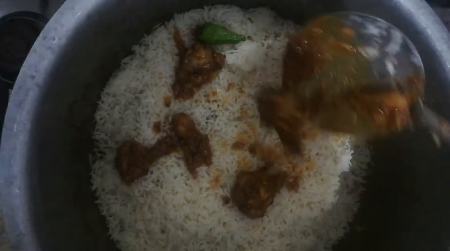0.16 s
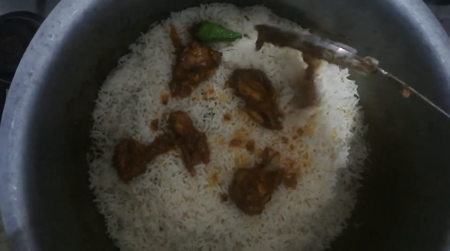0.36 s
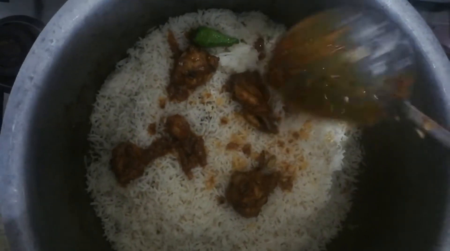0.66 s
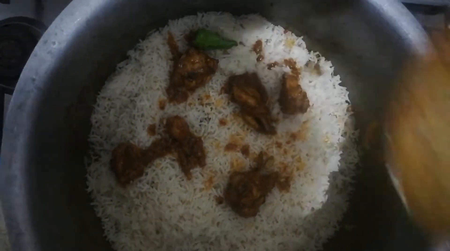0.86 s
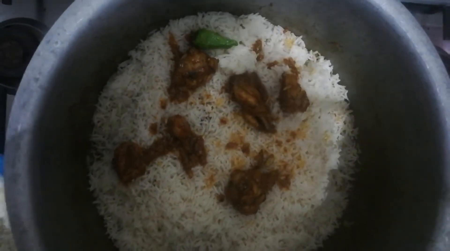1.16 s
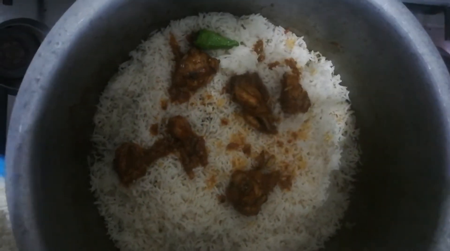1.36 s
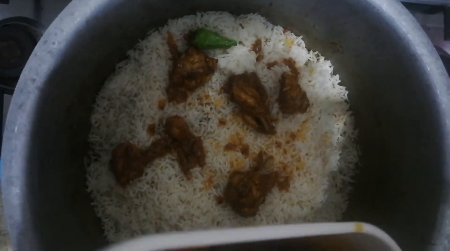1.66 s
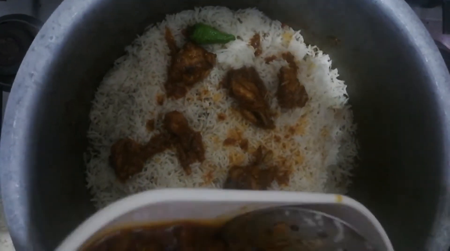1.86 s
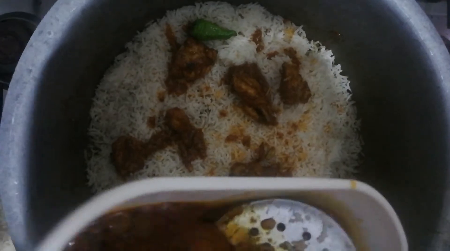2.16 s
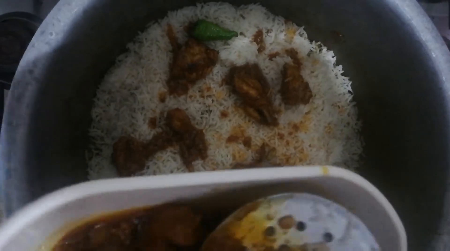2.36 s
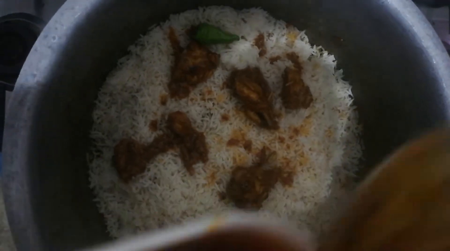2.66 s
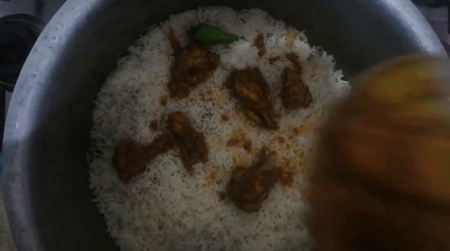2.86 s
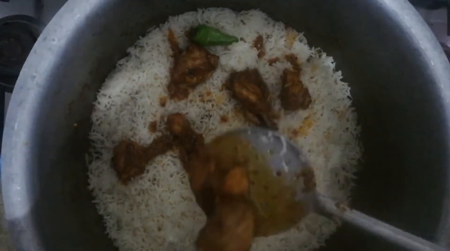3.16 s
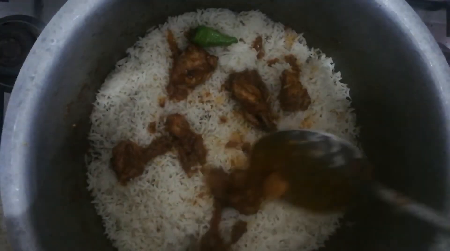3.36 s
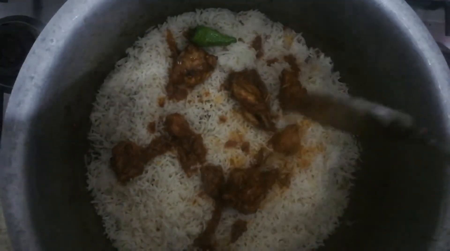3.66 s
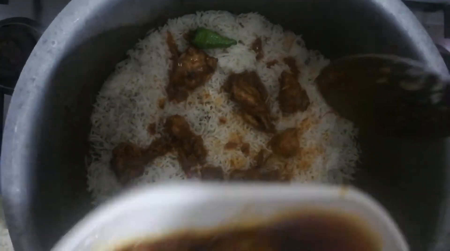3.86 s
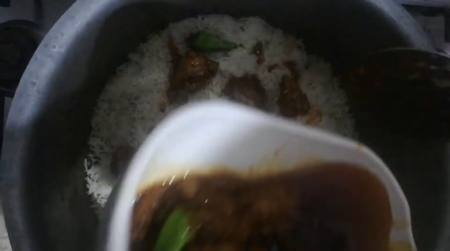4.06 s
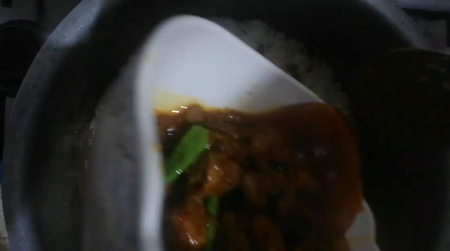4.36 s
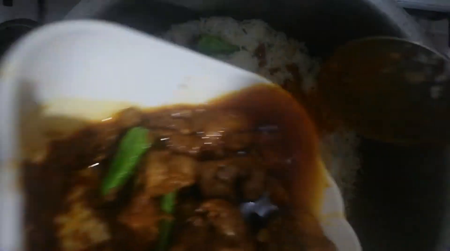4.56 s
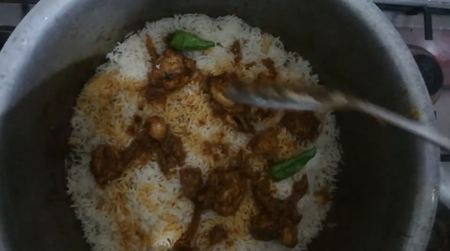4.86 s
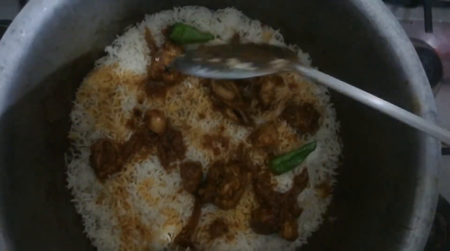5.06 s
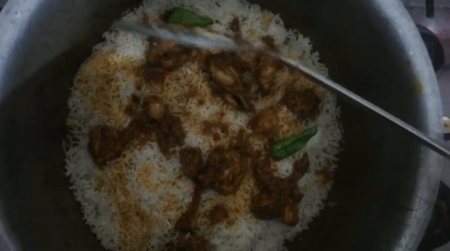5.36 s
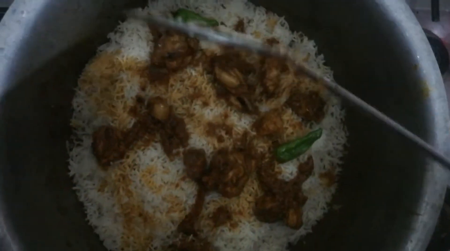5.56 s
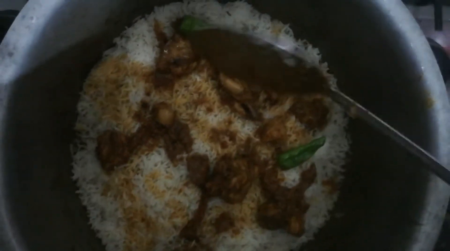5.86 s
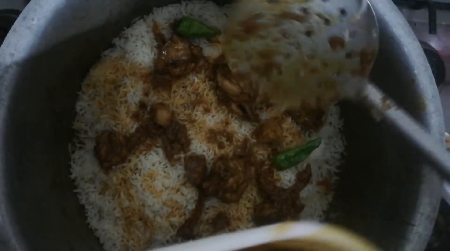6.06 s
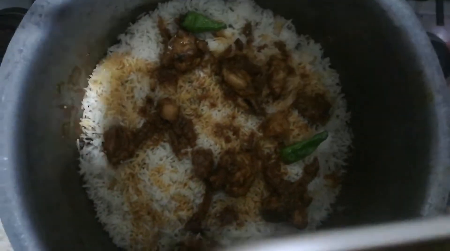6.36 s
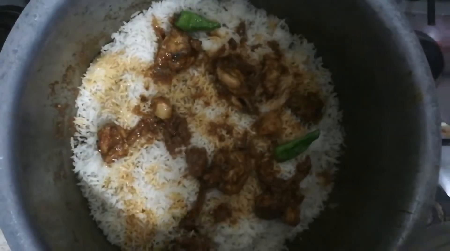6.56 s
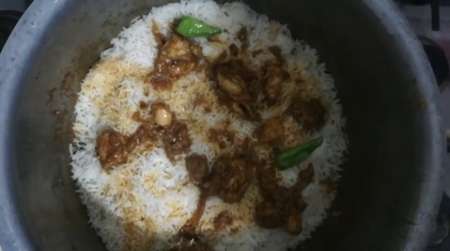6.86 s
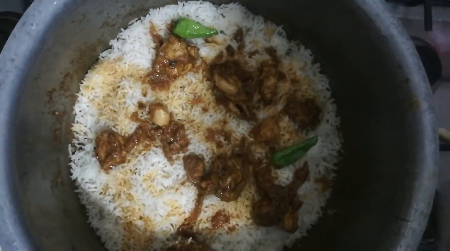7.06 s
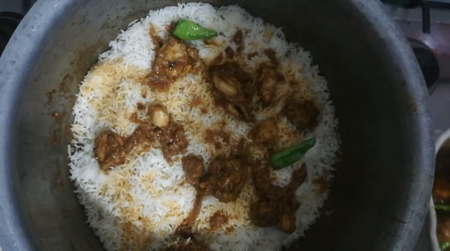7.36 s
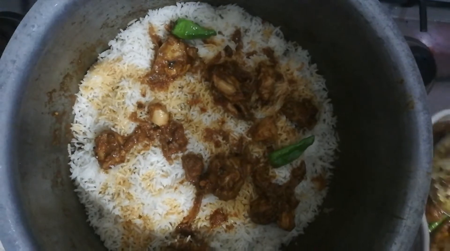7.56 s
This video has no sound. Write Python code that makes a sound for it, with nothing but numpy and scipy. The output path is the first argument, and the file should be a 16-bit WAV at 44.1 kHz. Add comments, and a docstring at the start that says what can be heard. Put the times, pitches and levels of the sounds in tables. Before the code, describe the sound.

Food simmers faintly over a low hum in a small, hard-walled kitchen, with a brief sizzle and soft bumps on the microphone. A steel spoon knocks several times in a plastic bowl close by, and a big metal pot takes one dull, ringing bump. The spoon squelches out of the curry, then gravy slides off it with tiny wet pops. The simmer settles and a soft, low rumble sets in.

```python
"""Curry is spooned from a plastic bowl onto rice in a big metal pot, in a small hard-walled kitchen.
Over a low hum the food simmers, the first spoonful sizzles and a hand softly bumps the microphone.
From 1.5 s the steel spoon knocks and scrapes in the bowl; the pot takes one ringing bump at 2.2 s.
The spoon squelches free at 2.7 s. Gravy slides off it around 4.8 s, as the simmer settles,
and a low rumble, likely the gas flame, sets in under the pot."""
import sys
import numpy as np
from scipy import signal
from scipy.fft import rfft, irfft, next_fast_len
from scipy.io import wavfile
from scipy.ndimage import uniform_filter1d

SR = 44100
rng = np.random.default_rng(int(sys.argv[2]) if len(sys.argv) > 2 else 0)


def inscribe(sig):
    """Save sig as 16-bit PCM at rate SR to the path in sys.argv[1].

    A 1-D sig is mono; a 2-D sig holds one channel per row.
    Samples are clipped to [-1, 1] before scaling.
    """
    pcm = np.round(np.clip(np.atleast_2d(sig).T, -1, 1) * 32767)
    wavfile.write(sys.argv[1], SR, pcm.astype(np.int16))


N = 340493
TIME = np.arange(N) / SR
RING = np.arange(2 ** 16) / SR  # time axis of one hit and its tail, s


def amp(db):
    """Decibels to gain."""
    return 10 ** (np.asarray(db) / 20)


def unit(x):
    """Scale to rms 1."""
    return x / np.sqrt(np.mean(x ** 2))


def add(out, s, x):
    """Mix x into out from time s on."""
    i = int(s * SR)
    out[i:i + len(x)] += x[:N - i]


def fade(t60):
    """Exponential decay, 60 dB down after t60 seconds."""
    return np.exp(-np.log(1000) * RING / t60)


def ramp(from_s, to_s):
    """0 before from_s, 1 after to_s, straight between."""
    return np.clip((TIME - from_s) / (to_s - from_s), 0, 1)


def waver(per_s):
    """Random modulation with rms 1, gliding to a new value per_s times a second."""
    return unit(np.interp(TIME * per_s, np.arange(1000), rng.standard_normal(1000)))


def at_hz(hz, points):
    """Read (f/Hz, value) points on a log-frequency axis."""
    f, value = np.transpose(points)
    return np.interp(np.log(hz + 1), np.log(f), value)


def colour(x, points):
    """EQ x along (f/Hz, level/dB) points, with steep skirts past both ends; rms 1."""
    size = next_fast_len(len(x), real=True)
    hz = np.fft.rfftfreq(size, 1 / SR) + 1
    skirts = 1 / np.sqrt(1 + (.8 * points[0][0] / hz) ** 8 + (.8 * hz / points[-1][0]) ** 8)
    spectrum = rfft(x, size) * amp(at_hz(hz, points)) * skirts
    return unit(irfft(spectrum, size)[:len(x)])


def noise(points, like=TIME):
    """Coloured noise with rms 1."""
    return colour(rng.standard_normal(len(like)), points)


def bursts(per_s, spread_db):
    """Crackle: many tiny clicks of uneven size."""
    fires = rng.random(N) < per_s / SR
    size = np.minimum(rng.exponential(size=N), 5)
    return fires * amp(spread_db * size) * rng.choice([-1, 1], N)


def band(x, hz, width_hz):
    """Two identical resonators in series, each width_hz wide."""
    b, a = signal.iirpeak(hz, hz / min(width_hz, SR / 4), fs=SR)
    return signal.lfilter(b, a, signal.lfilter(b, a, x))


def soften(x, hz):
    """Low-pass: a softer contact loses the treble above hz."""
    return signal.sosfilt(signal.butter(2, hz, fs=SR, output="sos"), x)


def thin(x, hz):
    """High-pass: a vessel radiates hardly any bass below hz."""
    return signal.sosfilt(signal.butter(3, hz, "high", fs=SR, output="sos"), x)


def drone(tones):
    """Narrow resonances kept going by noise."""
    return sum(amp(db) * unit(band(rng.standard_normal(N), hz, 2 * width)) for hz, width, db in tones)


def ring(modes, contact_s=0.00034):
    """Struck modes (f/Hz, level/dB, t60/s) that build up while the contact lasts."""
    out = np.zeros(len(RING))
    for k, (hz, db, t60) in enumerate(modes):
        t = RING[:int(2 * t60 * SR)]
        out[:len(t)] += (-1) ** k * amp(db - 60 * t / t60) * np.sin(2 * np.pi * hz * t)
    return out * (1 - np.exp(-RING / contact_s))


def die_away(x, t60s):
    """Let each octave of x decay at its own rate, read from (f/Hz, t60/s) points."""
    spectrum = rfft(x)
    octave = np.log2(np.maximum(np.fft.rfftfreq(len(x), 1 / SR), 64))
    out = np.zeros(len(x))
    for k in range(6, 16):
        share = np.maximum(1 - abs(octave - k), 0)
        out += irfft(spectrum * share, len(x)) * fade(at_hz(2 ** k, t60s))
    return out


def reverb(x, tail):
    """Convolve x with a tail scaled to an energy of 1."""
    return signal.fftconvolve(x, tail / np.sqrt(np.sum(tail ** 2)))[:N]


def hum(start_db=-65.5, fall_db_per_s=0.5, waver_db=0.8):
    """Appliance hum: a wavering, slowly fading low bed under four steady resonances."""
    # spectrum of the bed: f/Hz, level/dB
    bed_colour = [(12, -44), (20, -9), (43, -5.5), (81, -4), (105, -6), (135, -3.5), (179, -6), (225, -4),
                  (263, -8.5), (600, -18.5), (780, -49), (1320, -120)]
    # appliance resonances: f/Hz, width/Hz, level/dB
    tones = [(80.4, 4.7, -74.5), (150, 14, -76.5), (213.2, 5.9, -73), (235.2, 4.9, -76.5)]
    level_db = start_db - fall_db_per_s * TIME + waver_db * waver(per_s=3.87)
    return amp(level_db) * noise(bed_colour) + drone(tones)


def simmer(early_db=-64, late_db=-73.5, flicker_db=1.5):
    """Hot food simmers in dense, tiny pops, then settles to a fainter fizz."""
    # spectrum of the fizz: f/Hz, level/dB
    fizz_colour = [(600, -19), (1100, -11), (1500, -3.5), (2500, 1), (4700, 1.5), (6000, -5.5), (8000, -12),
                   (11000, -9), (15500, -20)]
    level_db = early_db + (late_db - early_db) * ramp(3.65, 5.5) + flicker_db * waver(per_s=60)
    return amp(level_db) * colour(bursts(per_s=6000, spread_db=3.5), fizz_colour)


def room_tone(level_db=-65):
    """The even hiss of the kitchen."""
    # spectrum of the hiss: f/Hz, level/dB
    hiss_colour = [(320, -15), (550, -8), (660, -7), (815, -2), (978, -2.5), (1190, -0.5), (1280, -3),
                   (1620, -1), (2120, -1.5), (2620, -8), (3180, -8.5), (4280, -10), (8880, -9.5),
                   (11400, -12), (15800, -28)]
    return amp(level_db) * noise(hiss_colour)


def spatter(per_s=9, level_db=-56, spread_db=2, centre_hz=1790, spread_octaves=0.3):
    """The cooking food spits faintly: one snap at a random moment in each time slot."""
    out, count = np.zeros(N), int(per_s * N / SR)
    for slot, (when, size, pitch) in enumerate(rng.uniform(-1, 1, (count, 3))):
        spit = snap(centre_hz * 2 ** (spread_octaves * pitch))
        add(out, (slot + .5 + .5 * when) / per_s, amp(level_db + spread_db * size) * spit)
    return out


def snap(hz, t60=0.028, attack_s=0.00023):
    """A short noise burst around hz with a peak of 1: a film of sauce breaks, or a bit of food lands."""
    envelope = (fade(t60) * (1 - np.exp(-RING / attack_s)))[:SR // 20]
    burst = band(rng.standard_normal(len(envelope)) * envelope, hz, width_hz=0.77 * hz)
    return burst / abs(burst).max()


def sizzle(peak_s=0.6, spread_s=0.83, level_db=-70):
    """The first spoonful sizzles on the hot rice: a fine, high fizz that swells and fades."""
    fizz = band(bursts(per_s=2200, spread_db=3), hz=10700, width_hz=4800)
    swell = np.exp(-((TIME - peak_s) / spread_s) ** 2)
    return amp(level_db) * swell * unit(fizz)


def gravy(rise_octaves_per_s=36.2):
    """Films of sauce snap and bits of food land; the air pockets behind the films chirp raggedly upward as they
    open."""
    # larger air pockets: t/s, starting f/Hz, level/dB, length/s
    bubbles = [(2.667, 3620, -50, .008), (2.68, 3010, -31, 0.0028), (2.698, 4480, -31.5, 0.0041),
               (2.722, 6100, -51, .005), (2.774, 4820, -40, 0.0045), (2.786, 8500, -51, 0.0041),
               (4.59, 2800, -45.5, .0035), (4.631, 3030, -47.5, 0.0083), (4.698, 3270, -46.5, 0.0081),
               (4.733, 5070, -44, 0.0087), (4.738, 8890, -39, 0.0077), (4.774, 3700, -46.5, 0.005),
               (4.778, 3660, -51, 0.0069), (4.7945, 5700, -47, 0.0055), (4.844, 2470, -52, 0.017),
               (4.869, 8700, -53.5, 0.0071), (4.882, 2560, -58, 0.0069)]
    # sticky snaps of sauce, and soft knocks of food landing near 2 kHz: t/s, level/dB, centre f/Hz, t60/s
    snaps = [(0.1913, -44.5, 2100, .025), (.4464, -41, 9450, .019), (.621, -45, 8500, .019),
             (0.675, -46, 1790, 0.017), (0.7652, -46, 2620, 0.021), (1.423, -45.5, 2380, 0.015),
             (2.522, -46.5, 3750, 0.028), (2.663, -41, 11300, 0.0092), (2.68, -35, 8000, .008),
             (2.684, -28.5, 11900, 0.01), (2.6839, -32, 1440, 0.011), (2.6892, -27.5, 2720, 0.016),
             (2.697, -29.5, 10000, 0.015), (2.7103, -35, 9550, .012), (2.714, -46, 14500, .014),
             (2.7475, -42, 14000, 0.011), (3.022, -48, 1600, .035), (3.338, -48.5, 1970, .03),
             (3.4342, -46, 1990, 0.019), (3.538, -51, 1800, 0.022), (3.571, -45, 12000, .019),
             (3.625, -50, 1730, 0.032), (4.556, -50, 1500, 0.044), (4.5895, -50, 10000, .014),
             (4.6125, -52, 11000, .012), (4.634, -49, 7500, .025), (4.657, -48, 6000, .012),
             (4.681, -49, 3600, .014), (4.693, -48, 5800, .025), (4.699, -49, 2010, 0.074),
             (4.775, -46, 4200, .012), (4.846, -50, 2900, .025), (4.7, -48, 6000, .016),
             (4.723, -44, 6500, .016), (4.7403, -34, 10000, 0.014), (4.7455, -43, 9000, .02),
             (4.7955, -41, 6800, .014), (4.808, -43, 10000, .025), (5.163, -51, 1800, .03),
             (5.2558, -53, 1800, .03), (6.556, -55.5, 1700, .03), (7.36, -55, 1600, .03)]
    out = np.zeros(N)
    for s, hz, db, length_s in bubbles:
        chirp = blip(hz, length_s, rise_octaves=rise_octaves_per_s * length_s)
        add(out, s, amp(db) * ragged(chirp, depth=0.57))
    for s, db, hz, t60 in snaps:
        add(out, s, amp(db) * snap(hz, t60))
    return out


def blip(hz, length_s, rise_octaves=0):
    """A short sine that swells fast and dies, gliding up by rise_octaves."""
    samples = int(length_s * SR)
    progress = np.arange(samples) / samples
    phase = 2 * np.pi * np.cumsum(hz * 2 ** (rise_octaves * progress)) / SR
    return np.sin(np.pi * progress ** .6) ** 2 * np.sin(phase)


def ragged(x, depth):
    """A tearing film shakes the level of a chirp."""
    shake = unit(uniform_filter1d(rng.standard_normal(len(x)), size=10))
    return x * (1 + depth * shake)


def vessels(sauce, scoop_from_s=1.5, scoop_to_s=2.9):
    """Wet sounds ring in the bowl during the scoop, otherwise in the pot; returns direct plus ring."""
    # resonance of the air in the bowl: f/Hz, level/dB
    bowl_air = [(700, -5), (1200, -1), (1480, 14), (1800, -5), (2200, 5), (2700, -4), (3100, 2), (3400, 6),
                (4300, -10), (5400, -10), (7000, -7), (10000, -1.5), (14000, -4)]
    # resonance of the air in the pot: f/Hz, level/dB
    pot_air = [(700, -13), (1600, -1), (1980, 3.5), (2400, -5), (3400, -2), (4500, -7), (5400, -1),
               (7000, -12), (9800, 1), (14000, -4.5)]
    scooping = (TIME > scoop_from_s) & (TIME < scoop_to_s)
    in_bowl = reverb(sauce * scooping, noise(bowl_air, RING) * fade(t60=0.36))
    in_pot = reverb(sauce * ~scooping, noise(pot_air, RING) * fade(t60=0.34))
    return sauce + amp(-9) * in_bowl + amp(-8.5) * in_pot


def handling():
    """Soft, low bumps of the hand reach the microphone through its case."""
    # hand bumps: t/s, f/Hz, level/dB, length/s
    bumps = [(0.207, 85, -32.5, 0.017), (1.225, 55.4, -42, 0.027), (1.274, 65, -48, 0.048),
             (1.474, 74.5, -44, 0.02)]
    out = np.zeros(N)
    for s, hz, db, length_s in bumps:
        add(out, s, amp(db) * blip(hz, length_s))
    return out


def spoon_knocks(crack_db=-17, clack_db=5.5, clack_follow=0.47):
    """Each hit cracks, thocks in the food-damped bowl and rings the spoon; returns (dry, room send)."""
    # hits: t/s, level/dB, hardness/dB, crack t60/s, low-pass f/Hz, contact spot, spoon ring/dB
    hits = [(1.5518, -0.5, -5.5, 0.035, 10100, 0.5, 2), (1.5573, -10, 2.5, 0.02, 9000, 0.5, -2),
            (1.7545, -.5, 2.5, 0.012, 13900, 1, -11), (2.0783, -1.5, -5, 0.018, 7950, 2, -9),
            (2.0941, -12.5, 2.5, 0.028, 5770, 2, -6), (2.353, -14.5, -4, 0.014, 4300, 3, -10)]
    # modes of the plastic bowl: f/Hz, t60/s, then level/dB at contact spots 0, 1, 2, 3
    bowl_modes = [(338, 0.033, -49, -35.5, -34.5, -45), (548.5, 0.091, -38.5, -26, -23.5, -40),
                  (607, 0.051, -23, -24.5, -53, -46), (791, 0.041, -59, -25, -35, -20.5),
                  (906, 0.046, -41, -21, -32, -42), (1000, 0.061, -56, -53, -38, -17),
                  (1146, 0.033, -36, -41, -18, -43), (1237, 0.06, -19.5, -22, -24.5, -36),
                  (1450, 0.013, -20, -16.5, -16.5, -17.5), (1916, 0.029, -50.5, -17, -44, -24),
                  (2202, 0.036, -22.5, -29.5, -32, -31), (2430, 0.033, -28, -35, -40, -28),
                  (2630, 0.05, -26, -28, -36, -29), (3085, 0.024, -45, -28.5, -32, -33),
                  (3840, 0.017, -26, -20.5, -23, -32), (4230, 0.015, -27, -35, -19, -25),
                  (4630, 0.028, -43, -21, -34.5, -30), (4910, 0.041, -29.5, -43, -37, -42),
                  (5580, 0.01, -22.5, -43, -28, -30), (6750, 0.011, -36, -18.5, -28, -28),
                  (7720, 0.011, -22, -11, -43, -27), (9500, .005, -35, -27, -39, -42),
                  (10800, 0.011, -20.5, -21, -31, -46)]
    # thin after-ring of the steel spoon: f/Hz, level/dB, t60/s
    spoon_modes = [(1244, -46, 0.59), (1300, -49, 0.61), (2170, -55, 0.49), (2471, -55, .45),
                   (2920, -54, 0.37), (3898, -62, 0.34), (4740, -56, 0.39), (4915, -56, 0.53),
                   (7900, -55, 0.4)]
    # spectrum of the contact crack: f/Hz, level/dB
    crack_colour = [(800, -25), (1800, 2.5), (3000, 1), (5000, -5), (8000, -3), (12000, -0.5), (15000, -17)]
    # spectrum of the clack sent to the walls: f/Hz, level/dB
    clack_colour = [(480, -6), (560, 7.5), (620, 1), (720, -2), (900, -9), (1070, -9), (1270, 4.5),
                    (1580, -4), (1900, 1), (2250, 0.5), (2700, -2), (3150, 0.5), (3400, -2.5), (3850, 2),
                    (4300, -6), (4750, -2), (6000, -5), (7550, -6), (7800, 1.5), (8050, -7.5), (10000, -4),
                    (15000, -12)]
    clack = colour(signal.unit_impulse(1024, 128), clack_colour) / np.sqrt(1024)  # energy 1
    direct, clacks = np.zeros(N), np.zeros(N)
    for s, db, hard_db, crack_t60, bright_hz, spot, spoon_db in hits:
        spot_modes = [(hz, levels[round(spot)], t60) for hz, t60, *levels in bowl_modes]
        thock = ring(spot_modes, contact_s=0.00065)
        crack = amp(crack_db + hard_db) * soften(noise(crack_colour, RING) * fade(crack_t60), bright_hz)
        add(direct, s, amp(db) * (thock + crack + amp(spoon_db) * ring(spoon_modes)))
        add(clacks, s, amp(db + clack_follow * hard_db + clack_db) * soften(clack, bright_hz))
    direct = thin(direct, hz=200)
    # the low modes reach the walls whole; the high ones blur into an even clack
    return direct, 0.84 * soften(direct, hz=1050) + clacks


def spoon_graze(from_s=1.665, to_s=1.752, level_db=-58):
    """Between knocks the spoon's edge grazes the plastic wall in a fine, bright rasp."""
    # spectrum of the rasp: f/Hz, level/dB
    rasp_colour = [(2000, -6), (4500, 0), (8000, 4), (11000, 0), (15000, -15)]
    gate = ramp(from_s, from_s + 0.016) * (1 - ramp(to_s, to_s + 0.005))
    return amp(level_db) * gate * colour(bursts(per_s=900, spread_db=1), rasp_colour)


def pot_bump(at_s=2.161, twin_db=-7, twin_detune=0.0079):
    """A dull blow on the rim; the pot is not quite round, so each mode beats with a weaker twin."""
    # spectrum of the blow itself: f/Hz, level/dB
    thud_colour = [(150, -5), (500, 5.5), (1100, 0), (1600, -4), (2400, -14), (3100, -11), (4500, -12),
                   (6500, -17.5), (10000, -23), (13000, -48)]
    # crowd of weak overtones: f/Hz, level/dB
    wash_colour = [(85, -11), (155, -6), (205, -4), (270, -9), (400, -13.5), (580, -10.5), (720, -20),
                   (950, -18), (1150, -20), (1350, -25), (2200, -26), (3500, -25), (4800, -21.5),
                   (6000, -30), (9500, -35), (13000, -58)]
    # modes of the pot, the quickly damped ones giving thud and bite: f/Hz, level/dB, t60/s
    modes = [(107, -42, 0.42), (124.9, -40.5, 1.22), (182, -46, 1.4), (199, -39.5, 1.1), (227.3, -36, 0.89),
             (215, -33, 0.077), (329, -24, 0.066), (336, -44, 0.79), (424, -49, 0.99), (444, -35, 0.044),
             (545, -50, 1.2), (564, -51, 1.3), (602, -19.5, 0.046), (611, -47, 1), (716, -26.5, 0.048),
             (664, -56, 1), (885, -45, 1.3), (993, -29, 0.063), (1103, -28.5, 0.12), (1110, -46, 0.75),
             (1173, -48, 1.2), (1365, -53, 1.1), (1529, -49, .55), (1581, -46, .75), (1651, -45, 0.8),
             (1764, -45, 0.65), (2218, -53, .62), (2264, -47, .6), (2324, -45, 0.66), (2940, -31.5, 0.061),
             (2961, -53, 0.55), (3488, -46, .42), (3780, -55, 0.41), (4250, -31, 0.039), (4380, -49, .42),
             (5000, -34, 0.041), (4980, -58, .6), (5039, -57, .6)]
    twins = [(hz * (1 + twin_detune), db + twin_db, t60) for hz, db, t60 in modes]
    thud = amp(-23.5) * noise(thud_colour, RING) * fade(t60=0.053)
    wash = amp(-36.5) * die_away(noise(wash_colour, RING), t60s=[(200, 1.05), (8000, 0.44)])
    wall = amp(-2) * (ring(modes) + ring(twins))
    out = np.zeros(N)
    add(out, at_s, thud + wash + wall)
    return thin(out, hz=65)


def spoon_drag(peak_s=2.61, spread_s=0.049, level_db=-58):
    """The spoon drags along the bottom of the bowl; its small slips stir the low modes."""
    # low modes of the bowl: f/Hz, width/Hz, level/dB
    tones = [(570, 60, -1), (790, 65, -1), (930, 120, -1)]
    slips = bursts(per_s=400, spread_db=2.5)
    body = sum(amp(db) * unit(band(slips, hz, 2 * width)) for hz, width, db in tones)
    swell = np.exp(-((TIME - peak_s) / spread_s) ** 2)
    return amp(level_db) * swell * unit(body)


def spoon_lift(at_s=2.684):
    """The spoon clips the rim as it lifts out, and rings faintly."""
    # tick on the rim and ring of the spoon: f/Hz, level/dB, t60/s
    modes = [(980, -39, 0.019), (1470, -58.5, .9), (1510, -38, 0.027), (2186, -58, .5), (2450, -31, .02),
             (3095, -51, .4), (3400, -53, .28), (3730, -33, .025)]
    out = np.zeros(N)
    add(out, at_s, ring(modes))
    return out


def squelch(at_s=2.6885, length_s=0.0081, level_db=-33, shut_hz=2000, open_hz=4470, octaves_per_s=245):
    """Suction breaks under the spoon: a ragged chirp climbs as the cavity opens, then holds its pitch."""
    t = np.arange(int(length_s * SR)) / SR
    hz = np.minimum(shut_hz * 2 ** (octaves_per_s * t), open_hz)
    envelope = np.sqrt(np.sin(np.pi * t / length_s))
    chirp = envelope * np.sin(2 * np.pi * np.cumsum(hz) / SR)
    out = np.zeros(N)
    add(out, at_s, amp(level_db) * ragged(chirp, depth=0.34))
    return out


def pour(peak_s=4.8, level_db=-61.5, rise_db_per_s=60, fall_db_per_s=152):
    """Gravy slides off the spoon in a froth of tiny bursting bubbles; the flow builds and breaks off."""
    # one resonance for each bubble size: f/Hz, width/Hz, level/dB
    bubble_tones = [(2000, 250, -13), (3620, 1200, -7), (5500, 3300, -5), (7500, 2800, -6.5),
                    (10300, 2300, -5.5)]
    froth = sum(amp(db) * unit(band(bursts(per_s=1400, spread_db=3.5), hz, width))
                for hz, width, db in bubble_tones)
    flow_db = np.minimum(rise_db_per_s * (TIME - peak_s), fall_db_per_s * (peak_s - TIME))
    return amp(level_db + flow_db) * froth


def flame(on_s=4.885, catch_s=0.0065, flutter_db=2):
    """A low rumble, likely the burner: it catches at once, surges unevenly, then burns lower."""
    # surges of the flame: t/s, level/dB
    surges = [(4.89, -55), (5.02, -51), (5.16, -56.5), (5.28, -52), (5.44, -54.5), (5.78, -50), (5.91, -54),
              (6.01, -49), (6.12, -54.5), (6.23, -51), (6.32, -58), (6.6, -54), (6.73, -58.5), (7.15, -58),
              (7.65, -54.5)]
    # spectrum of the roar: f/Hz, level/dB
    roar_colour = [(12, -52), (20, -5.5), (70, -2.5), (113, 2), (151, -2), (209, 1), (245, -5), (279, -3.5),
                   (305, -12.5), (337, -12), (368, -16.5), (472, -19), (650, -32.5), (840, -64),
                   (1430, -120)]
    # hollows the flame stirs: f/Hz, width/Hz, level/dB against the roar
    hollows = [(118, 9, -11.5), (214.7, 8.5, -9.5), (337, 11, -18.5)]
    level_db = np.interp(TIME, *np.transpose(surges)) + flutter_db * waver(per_s=26)
    return ramp(on_s, on_s + catch_s) * amp(level_db) * (noise(roar_colour) + drone(hollows))


def kitchen(send, wet_db=-12.5, build_s=0.006):
    """Dense echoes off hard walls build up quickly, the treble dying first."""
    # spectrum of the echoes: f/Hz, level/dB
    tail_colour = [(100, -1.5), (550, 1), (1000, 2.5), (2300, 0.5), (4500, -6), (9000, -1), (15000, -4)]
    # decay of the room: f/Hz, t60/s
    t60s = [(150, 1), (550, 1), (2000, 0.9), (5000, 0.54), (9000, 0.56), (15000, 0.3)]
    build_up = 1 - np.exp(-(RING / build_s) ** 2)
    tail = die_away(noise(tail_colour, RING), t60s) * build_up
    return amp(wet_db) * reverb(send, tail)


def scene():
    """Utensils and food close by, the kitchen around them; mono."""
    knocks, knock_send = spoon_knocks()
    sauce = vessels(soften(squelch() + gravy() + pour(), hz=12500))
    pot = pot_bump()
    echoes = kitchen(knock_send + amp(-10.5) * sauce + amp(-7) * pot)
    low_end = handling() + flame() + hum()
    fade_in = amp(-3.5 * (1 - ramp(0, 0.35)))
    bed = fade_in * (simmer() + room_tone()) + spatter() + sizzle()
    spoon_moves = spoon_drag() + spoon_graze() + spoon_lift()
    return (knocks + sauce + pot + echoes + low_end + bed + spoon_moves)[None]


def record(dry, top_hz=15850):
    """A steep low-pass cuts the very top of the mix."""
    return signal.sosfilt(signal.ellip(10, .1, 70, top_hz, fs=SR, output="sos"), dry)


dry = scene()
out = record(dry)
inscribe(out)
```